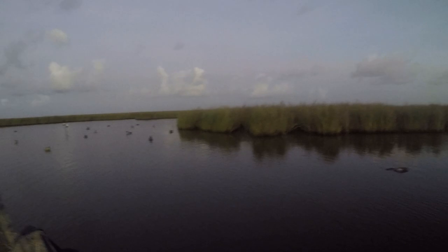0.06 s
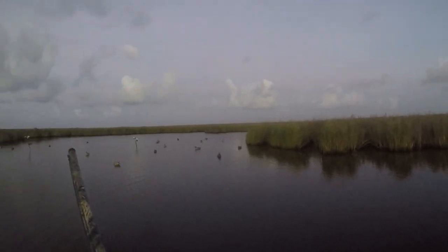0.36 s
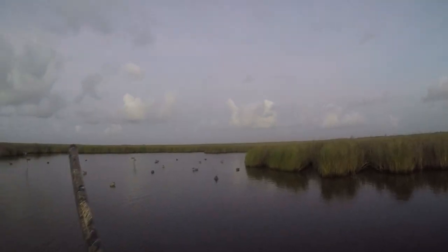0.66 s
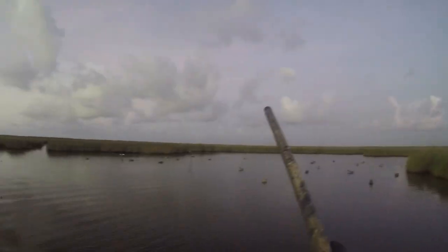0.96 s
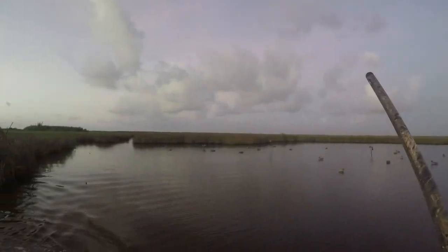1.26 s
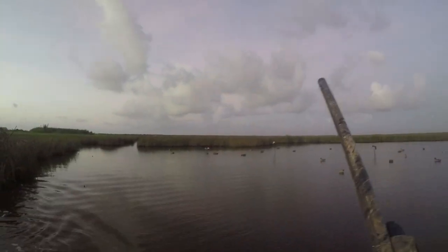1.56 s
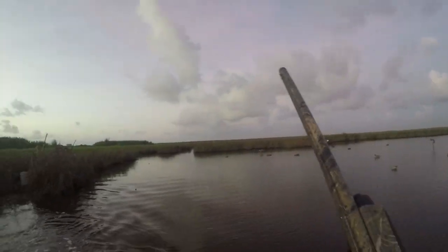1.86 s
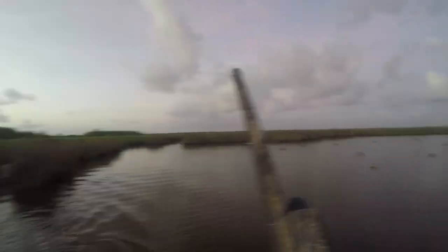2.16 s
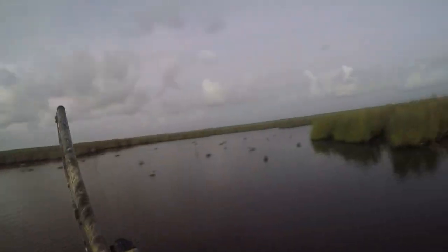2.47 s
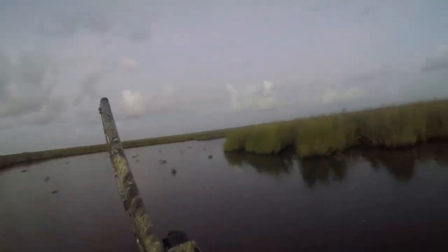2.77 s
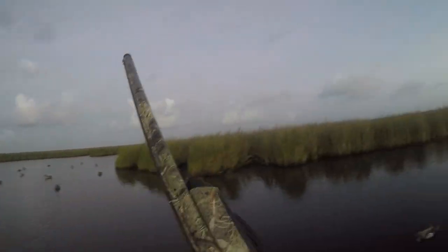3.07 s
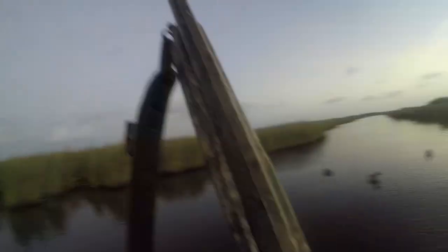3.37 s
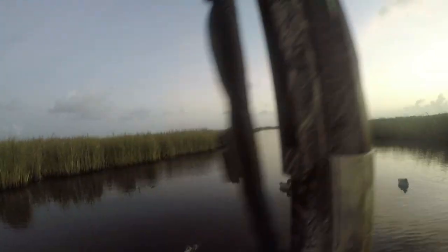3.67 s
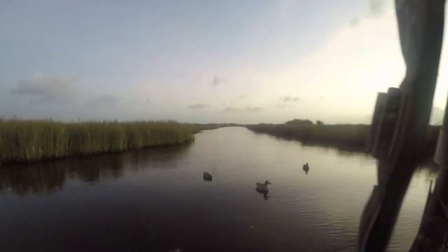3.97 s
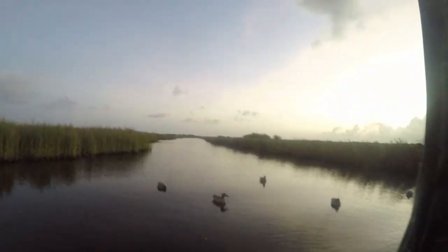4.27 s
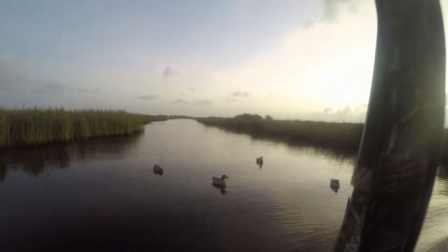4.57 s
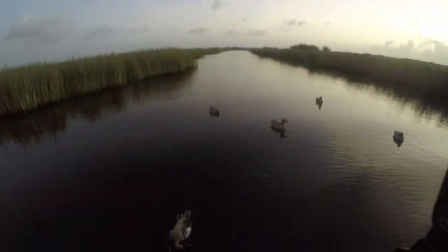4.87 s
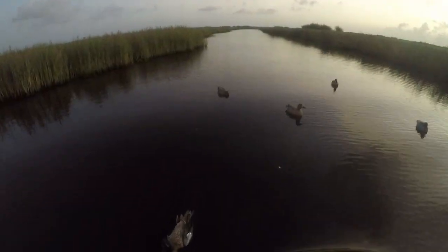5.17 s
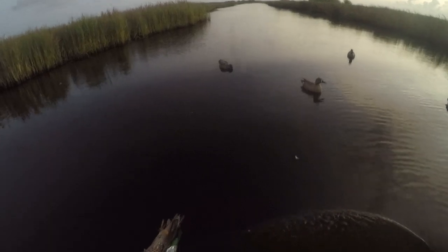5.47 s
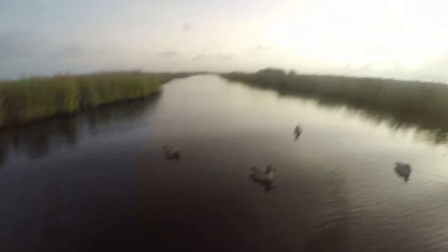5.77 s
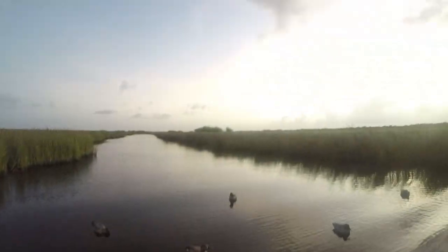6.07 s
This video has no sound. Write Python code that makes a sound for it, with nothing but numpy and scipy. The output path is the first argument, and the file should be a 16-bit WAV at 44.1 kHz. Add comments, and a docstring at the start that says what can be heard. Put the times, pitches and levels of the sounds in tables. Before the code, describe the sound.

Legs slosh and gurgle through a shallow marsh while wind buffets the microphone, gear clicks and faint insects buzz.

```python
"""Legs wade slowly through a shallow marsh, about a stride a second, heard from a head-worn camera.
Each leg pushes up a churn of bubbles and spray; between strides the water gurgles, plops and drips,
and carried gear clicks. Wind rumbles on the two microphone ports and buffets them harder near the end.
Insects sizzle in the reeds."""
import sys
import numpy as np
from scipy import signal
from scipy.fft import rfft, irfft
from scipy.io import wavfile
from scipy.ndimage import uniform_filter1d

SR = 44100
rng = np.random.default_rng(int(sys.argv[2]) if len(sys.argv) > 2 else 0)


def int16_out(signal):
    """Quantize to a 16-bit WAV file."""
    q = np.round(np.clip(np.atleast_2d(signal).T, -1, 1) * 32767)
    wavfile.write(sys.argv[1], SR, q.astype(np.int16))


N = 269430
TIME, HZ = np.arange(N) / SR, np.fft.rfftfreq(N, 1 / SR)
LEAD_S = .00028  # sound from the left reaches the left port this much earlier
SLOSH_BAND_HZ, SPRAY_BAND_HZ = (400, 1600), (2000, 6000)

# The tone of churned water. Each row: frequency in Hz, gain in dB.
WATER_TONE = [(100, -47), (200, 3.5), (330, -0.5), (600, -2), (1000, -3), (1600, -5), (2400, -7.5),
              (3500, -17), (5500, -17.5), (7200, -21), (9500, -25.5), (11200, -41), (14500, -49.5),
              (16000, -81)]


def amp(db):
    """Decibels to gain."""
    return 10 ** (np.asarray(db) / 20)


def unit(x):
    """Scales to rms 1."""
    return x / np.sqrt(np.mean(x ** 2) + 1e-20)


def curve(rows):
    """Joins (seconds, value) points into a value at every sample."""
    return np.interp(TIME, *np.transpose(rows))


def shape(points, hz=HZ):
    """An EQ curve through (Hz, dB) points, as gain."""
    f, db = np.transpose(points)
    return amp(np.interp(np.log(hz + 1), np.log(f), db))


def band(f, hz, sharpness):
    """Gain of one broad resonance."""
    return 1 / np.hypot(1, sharpness * (f / hz - hz / (f + 1)))


def colour(x, gain):
    """Filters by a gain per frequency."""
    return irfft(rfft(x) * gain, N)


def levelled(x, band_hz):
    """Scales a pair so that its middle has rms 1 within a band."""
    return x / np.std(colour(x.mean(0), (HZ > band_hz[0]) & (HZ < band_hz[1])))


def drift(hz):
    """A random wobble of rms 1, up to the given rate."""
    return unit(colour(rng.standard_normal(N), 1 / (1 + (HZ / hz) ** 4)))


def surge(start, length, rise_s, fall_s, arch_db=0):
    """Power of one push: it swells 20 dB per rise_s, holds in an arch and falls 20 dB per fall_s."""
    t = TIME - start
    outside = np.maximum(-t, 0) / rise_s + np.maximum(t - length, 0) / fall_s
    arch = (2 * np.clip(t / length, 0, 1) - 1) ** 2
    return amp(-20 * outside - arch_db * arch) ** 2


def hump(centre_s, half_width_s):
    """A bell-shaped envelope."""
    return np.exp(-((TIME - centre_s) / half_width_s) ** 2 / 2)


def spread(side_db):
    """Left and right gains for a level difference, at constant power."""
    gains = amp(np.array([side_db, -side_db]) / 2)
    return gains / np.sqrt(np.mean(gains ** 2, axis=0))


def port_colour():
    """Left and right EQ: the housing favours the left port in two broad bands."""
    # Each row: frequency in Hz, left minus right in dB.
    housing_tilt = [(250, -1), (500, -1), (950, 5.5), (2000, 10), (3000, 3.5), (4800, -1.5), (6500, -7.5),
                    (7500, 13), (8800, 16), (11000, 6.5), (15000, 12)]
    tilt = np.sqrt(shape(housing_tilt))
    return np.array([tilt, 1 / tilt])


def noise_pair(gain, likeness, phase):
    """Coloured noise on two ports, partly alike, the left leading by a phase in radians."""
    left, other = rfft(rng.standard_normal((2, N)))
    right = likeness * left * np.exp(-1j * phase) + np.sqrt(1 - likeness ** 2) * other
    return irfft(np.array([left, right]) * gain, N)


def burst(gain_at, t60, size=4096, attack_s=.0008):
    """A short coloured puff of noise that snaps on and dies away."""
    t = np.arange(size) / SR
    puff = unit(irfft(rfft(rng.standard_normal(size)) * gain_at(np.fft.rfftfreq(size, 1 / SR))))
    return puff * np.exp(-np.log(1000) * t / t60) * (1 - np.exp(-t / attack_s))


def add(mix, s, sound, lead=LEAD_S):
    """Places a sound on both ports, lead seconds later on the right."""
    for port, start in zip(mix, (s, s + lead)):
        part = port[max(round(start * SR), 0):][:len(sound)]
        part += sound[:len(part)]


def bubble(hz, t60, octaves, onset_cycles=0.328):
    """Trapped air rings as a dying, gliding tone; a climb is the bubble nearing the surface."""
    t = np.arange(int(t60 * SR) + 8) / SR
    turns = np.cumsum(hz * 2 ** (octaves * t / t60)) / SR
    onset = 1 - np.exp(-turns / onset_cycles)
    return np.sin(2 * np.pi * turns) * np.exp(-np.log(1000) * t / t60) * onset


def bubble_cloud(count, low_hz, high_hz, size_db, ring_s, scatter_s=0.000075):
    """Bubbles of many sizes around the legs; ring_s is the mean t60 at 1 kHz, small ones die sooner."""
    cloud = np.zeros((2, N))
    for when, pitch, size, sustain, glide, place in rng.random((count, 6)):
        hz = low_hz * (high_hz / low_hz) ** np.sqrt(pitch)
        t60 = ring_s * (1000 / hz) ** .7 * (.5 + sustain)
        strength = amp(size_db * min(-np.log(1 - size), 3))
        lead = LEAD_S + scatter_s * (4 * place - 2)
        add(cloud, when * N / SR, strength * bubble(hz, t60, octaves=glide / 2 - .1), lead)
    return cloud


def froth(patch_db, flicker_db):
    """Torn water hisses in short patches, with gentle surges shared by all pitches."""
    noise = noise_pair(1, likeness=0.255, phase=2 * np.pi * HZ * LEAD_S)
    spectra = signal.stft(noise, nperseg=256)[2]
    patches = uniform_filter1d(rng.standard_normal(spectra.shape[1:]), size=5, axis=0)  # across pitch
    patches = unit(uniform_filter1d(patches, size=4, axis=1))  # across time
    hiss = signal.istft(spectra * amp(patch_db * 2 * np.tanh(patches / 2)), nperseg=256)[1][:, :N]
    return unit(hiss * amp(flicker_db * np.tanh(drift(29.1))))


def droplets(per_s=400, size_db=4.6):
    """Fine spray falls back as a patter of tiny ticks."""
    hits = rng.random(N) < per_s / SR
    ticks = hits * amp(size_db * np.minimum(rng.exponential(1, N), 4)) * rng.choice([-1, 1], N)
    port_delay = np.exp(-2j * np.pi * HZ * np.array([[0], [LEAD_S]]))
    return unit(colour(ticks, port_delay))


def stirring(lapping_spray_db=-7.5, spray_swell_share=0.65):
    """Envelopes of slosh and spray: the strides on top of the lapping they leave behind."""
    # A leg pushes through the water. Each row: start and length in seconds, relative slosh and spray
    # levels in dB, seconds for the slosh to swell by 20 dB, seconds for both to settle by 20 dB.
    strides = [(0.006, 0.037, -41.5, -47.5, .1, 0.73), (0.683, 0.2117, -34, -51.5, 0.23, 0.03),
               (1.197, 0.458, -39, -42.5, .12, 0.6), (1.66, 0.14, -27.3, -39.5, 0.45, 0.26),
               (2.539, 0.1905, -30.3, -43, 0.12, 0.4068), (3.291, 0.152, -34.5, -47.5, .5, 0.09),
               (3.582, 0.1067, -32.5, -41.5, 0.1848, 0.0644), (3.706, 0.2335, -31, -37, 0.0747, 0.4147),
               (4.95, 0.17, -35.5, -48, 0.2, 0.1), (5.165, 0.31, -29.5, -36, .35, .1),
               (5.857, 0.12, -31, -41, 0.05, .2), (5.97, 0.25, -28, -39.5, 0.15, .3)]
    # Stirred water between strides. Each row: time in seconds, relative level in dB.
    lapping = [(0, -51.5), (.5, -51), (1.0, -38.5), (2.35, -41.5), (3.0, -44.5), (4.4, -47), (5.7, -44.5)]
    lapping_db = curve(lapping)
    slosh, spray = amp(lapping_db) ** 2, amp(lapping_db + lapping_spray_db) ** 2
    for start, length, slosh_db, spray_db, swell, settle in strides:
        slosh += amp(slosh_db) ** 2 * surge(start, length, swell, settle, arch_db=1.5)
        spray += amp(spray_db) ** 2 * surge(start, length, swell * spray_swell_share, settle, arch_db=2)
    return np.sqrt(slosh), np.sqrt(spray)


def wading(split_hz=1900, slosh_db=-1, spray_db=-1.5,
           bubbles_db=1, glugs_db=-4, droplets_db=-2, fizz_db=-6):
    """Each stride swells a slosh of froth, bubbles and glugs and, above it, a hiss of spray and fizz."""
    tone, low = shape(WATER_TONE) * port_colour(), 1 / (1 + (HZ / split_hz) ** 4)
    as_slosh = lambda x: levelled(colour(x, tone * low), SLOSH_BAND_HZ)
    as_spray = lambda x: levelled(colour(x, tone * (1 - low)), SPRAY_BAND_HZ)
    bubbles = bubble_cloud(count=5000, low_hz=200, high_hz=3500, size_db=3, ring_s=.028)
    glugs = bubble_cloud(count=300, low_hz=200, high_hz=1700, size_db=2, ring_s=.05)
    fizz = bubble_cloud(count=2000, low_hz=1200, high_hz=9000, size_db=4, ring_s=.02)
    churn = as_slosh(froth(patch_db=3.5, flicker_db=3.5))
    churn += amp(bubbles_db) * as_slosh(bubbles) + amp(glugs_db) * as_slosh(glugs)
    slosh = levelled(churn, SLOSH_BAND_HZ)
    hiss = froth(patch_db=4.0, flicker_db=2.0) + amp(droplets_db) * droplets()
    spray = levelled(as_spray(hiss) + amp(fizz_db) * as_spray(fizz), SPRAY_BAND_HZ)
    push, throw = stirring()
    return slosh * push * amp(slosh_db) + spray * throw * amp(spray_db)


def blowing(steady_db=-19, breeze_db=-36):
    """Level rides in dB for the rumble and the buffeting: a steady wind with swells and gusts."""
    # Swells and lulls of the rumble. Each row: centre in seconds, lift or dip in dB.
    swells = [(.1, -6), (.33, 1.5), (.53, -10), (1.1, 4.5), (1.53, -3.5), (1.93, 3.5), (2.33, -3.5),
              (2.5, 2.5), (5.0, 2.5), (5.38, -7), (5.63, 5.5)]
    # Gusts on the ports. Each row: start in seconds, length in seconds, relative level in dB.
    gusts = [(0.1, 0.48, -21.5), (4.028, 0.165, -23), (4.413, 0.21, -25.5), (4.834, 0.07, -16.5),
             (5.118, 0.062, -23.5), (5.324, 0.0918, -16), (5.615, 0.233, -21), (5.901, 0.27, -18.5)]
    swell_db = steady_db + sum(db * hump(s, half_width_s=0.062) for s, db in swells)
    power = sum(amp(db) ** 2 * surge(s, length, rise_s=0.0997, fall_s=0.399) for s, length, db in gusts)
    return swell_db, 10 * np.log10(amp(breeze_db) ** 2 + power)


def wind(rumble_db=-4.0, buffet_db=-5.5, lump_db=3.5, rumble_side_db=7,
         flutter_db=-27, flutter_growth=1.973, flutter_hz=230):
    """Large eddies rumble on both ports; small ones buffet each port and flutter higher in hard gusts."""
    # The side the wind strikes. Each row: time in seconds, lean to the left in dB.
    wind_side = [(0, -3.5), (.5, -3), (1, 2), (3.85, 4.5), (4.0, -4.5), (5.4, -9), (5.7, -5.5)]
    # The tones of large and of small eddies. Each row: frequency in Hz, gain in dB.
    rumble_tone = [(8, -3), (22, -7.5), (36, -1.5), (50, -1.5), (75, -16), (120, -34.5), (300, -44.5),
                   (900, -84.5)]
    buffet_tone = [(20, -25), (55, 0.5), (110, 0), (170, -6.5), (260, -16), (400, -30), (800, -56.5),
                   (3000, -106)]
    side_db, (swell_db, gust_db) = curve(wind_side), blowing()
    rumble = levelled(noise_pair(shape(rumble_tone), likeness=.7, phase=1.0), band_hz=(20, 70))
    rumble *= spread(side_db + rumble_side_db) * amp(swell_db + rumble_db)
    eddies = levelled(noise_pair(shape(buffet_tone), likeness=.2, phase=0), band_hz=(80, 220))
    low_cut = HZ ** 2 / (HZ ** 2 + flutter_hz ** 2)
    flutter = unit(noise_pair(shape(buffet_tone) * low_cut, likeness=0, phase=0))
    flutter *= amp(flutter_db + flutter_growth * (gust_db + 19.5))
    buffet = eddies * amp(gust_db + buffet_db) + flutter
    lumps = amp(lump_db * np.array([drift(13.4), drift(23.2)]))
    return rumble + buffet * spread(side_db) * lumps


def insects(level_db=1, shimmer_db=1.5, housing_share=.35):
    """A distant chorus merges into one steady sizzle, partly coloured by the housing."""
    # The sizzle peaks near 7 kHz. Each row: frequency in Hz, gain in dB.
    chorus_tone = [(3000, -28), (6000, -17.5), (6650, -10.5), (6980, -.5), (7250, 1), (7550, -5),
                   (7950, -13.5), (8800, -15), (11000, -28), (15500, -38)]
    # Its slow rise and fall. Each row: time in seconds, relative level in dB.
    chorus_ride = [(0.0, -48.5), (2.3, -51), (3.25, -46), (4.35, -48.5), (6.11, -51)]
    chorus = noise_pair(shape(chorus_tone) * port_colour() ** housing_share, likeness=0.328, phase=2.61)
    chorus *= amp(shimmer_db * drift(71))
    return levelled(chorus, band_hz=(6800, 7600)) * amp(curve(chorus_ride) + level_db)


def plops(level_db=4, ring_s=.031, glide_stretch=.35, slop_db=-4, slop_ratio=0.752,
          db_per_octave=-4, twin_db=-7, twin_ratio=1.45, twin_s=.007):
    """A cavity claps shut with a hollow slop; the trapped air rings, and a smaller bubble splits off."""
    # The larger air pockets. Each row: start in seconds, relative level in dB, starting pitch in Hz,
    # glide in octaves over the ring.
    pockets = [(.073, -26, 390, -1.4), (.678, -32, 667, 0), (.888, -28, 720, -.5), (.982, -25, 290, 0.5),
               (1.004, -20.5, 345, 1.5), (1.091, -25, 298, -0.8), (1.197, -28, 725, -.5),
               (1.227, -26.5, 1450, .5), (1.287, -23.5, 1012, 0.5), (1.356, -24, 1516, -0.3),
               (1.533, -25, 340, .5), (1.547, -26, 1600, 0), (1.638, -24, 850, .7), (1.721, -20.5, 490, .4),
               (1.884, -21.5, 400, -.6), (2.051, -30, 1200, .3), (2.072, -30.5, 560, 1.1),
               (2.179, -31, 1680, .6), (2.229, -29.5, 1300, -.6), (2.286, -30.5, 600, -.4),
               (2.355, -26, 830, -1.4), (2.436, -22, 320, .6), (2.464, -29, 1030, .3),
               (2.548, -21, 800, -.5), (2.575, -23, 1200, .7), (2.604, -20, 780, 0.1),
               (2.801, -18, 300, .7), (2.843, -25, 590, .3), (3.008, -25, 240, -.5), (3.096, -21, 479, 0.8),
               (3.202, -22.5, 326, -1), (3.403, -17.5, 500, .6), (3.428, -26.5, 1126, -0.5),
               (3.587, -23.5, 1950, .5), (3.616, -23, 611, 0.3), (3.66, -24, 1480, .3),
               (3.85, -22, 297, 0.1), (3.973, -23, 1458, -0.3), (4.434, -26.5, 720, .3),
               (4.509, -28.5, 800, 2.4), (4.604, -23, 1150, 0.1), (4.647, -27, 850, 0.1),
               (4.675, -24.5, 1054, -.3), (4.707, -30, 1950, -.7), (4.722, -22.5, 1425, -1),
               (4.79, -32, 1080, .8), (4.945, -25, 770, .4), (4.992, -26, 814, -0.7),
               (5.168, -22, 888, 0.4), (5.267, -21.5, 890, .4), (5.348, -18.5, 519, -0.3),
               (5.38, -23, 1180, .6), (5.459, -23, 495, .7), (5.641, -33, 875, .6), (5.868, -24, 1007, -1),
               (5.972, -18.5, 360, .3)]
    out = np.zeros((2, N))
    for s, db, hz, octaves in pockets:
        t60 = ring_s * np.sqrt(1000 / hz) * (1 + glide_stretch * octaves ** 2)
        slop = burst(lambda f: band(f, hz * slop_ratio, sharpness=0.68) ** 2, t60)
        twin = bubble(hz * twin_ratio, t60 / 2, octaves=0)
        small_db = db_per_octave * max(np.log2(hz / 500), 0)  # small pockets: less slop and twin
        add(out, s, amp(db + level_db) * bubble(hz, t60, octaves))
        add(out, s, amp(db + level_db + slop_db + small_db) * slop)
        add(out, s + twin_s, amp(db + level_db + twin_db + small_db) * twin)
    return out


def slaps(level_db=3, sharpness=2.86, top_hz=10500):
    """Flung water lands with a broad, short splat."""
    # Each row: start in seconds, relative level in dB, t60 in seconds, centre in Hz.
    landings = [(.073, -32.5, 0.0127, 7960), (0.938, -29, 0.0093, 8800), (1.004, -25, 0.058, 2006),
                (1.009, -20.5, 0.0406, 4950), (1.078, -27, 0.0089, 7960), (1.468, -28, 0.0102, 7000),
                (2.108, -27, 0.0119, 6700), (2.2, -22, 0.0197, 4400), (2.869, -27, 0.028, 6420),
                (3.183, -22, 0.026, 2080), (3.732, -20.5, 0.0146, 4500), (3.75, -24, .018, 4600),
                (4.435, -28, .017, 1600), (5.093, -17, 0.016, 3650), (5.142, -25, .015, 6000),
                (5.168, -18, 0.026, 2380), (5.296, -22, 0.0202, 2570), (5.404, -22, 0.022, 2090),
                (5.445, -19, 0.0122, 5680), (5.864, -22, 0.035, 1600)]
    out = np.zeros((2, N))
    for s, db, t60, hz in landings:
        splat = burst(lambda f: band(f, hz, sharpness) / (1 + (f / top_hz) ** 10), t60)
        add(out, s, amp(db + level_db) * splat)
    return out


def mist(centre_hz=8370, sharpness=4.0, top_hz=11000):
    """At the crest of a brisk stride the finest spray sizzles back onto the water."""
    # Each row: time of the crest in seconds, level in dB.
    crests = [(.87, -47.5), (1.77, -39), (2.7, -42.5), (3.82, -49)]
    tone = port_colour() * band(HZ, centre_hz, sharpness) / (1 + (HZ / top_hz) ** 8)
    sizzle = unit(colour(droplets(per_s=4200, size_db=4.5), tone))
    return sizzle * sum(amp(db) * hump(s, half_width_s=0.0614) for s, db in crests)


def dribble(fade_s=0.12):
    """Water runs off the lifted leg in a dense gurgle."""
    # Each row: start in seconds, length in seconds, level in dB.
    runoffs = [(1.16, .24, -41.5), (2.02, .36, -45), (3.146, .3, -40), (4.76, .32, -41.5)]
    plinks = bubble_cloud(count=2200, low_hz=350, high_hz=2100, size_db=2.5, ring_s=.028)
    flow = np.sqrt(sum(amp(db) ** 2 * surge(s, length, fade_s, fade_s) for s, length, db in runoffs))
    return levelled(colour(plinks, shape(WATER_TONE) * port_colour()), SLOSH_BAND_HZ) * flow


def gear():
    """Gun and sling fittings knock: a hard tick sets a small part ringing."""
    # Each row: start in seconds, relative level in dB, tick t60 in seconds, ring against tick in dB.
    knocks = [(1.3066, -7.5, 0.0099, -39), (4.338, -18, 0.0173, -7)]
    # The fitting's modes. Each row: frequency in Hz, relative level in dB, t60 in seconds.
    modes = [(1068, -3, 0.044), (1920, -15, 0.048), (3196, -20, 0.16), (6480, -7, 0.05), (7650, -12, 0.035)]
    # The tick's bright tone. Each row: frequency in Hz, gain in dB.
    tick_tone = [(500, -6.5), (1900, -2), (2800, 4.5), (5500, -2), (8500, 2.5), (10500, -0.5), (13000, -17)]
    out, t = np.zeros((2, N)), np.arange(SR // 4) / SR
    ring = sum(amp(db) * np.exp(-np.log(1000) * t / t60) * np.sin(2 * np.pi * hz * t)
               for hz, db, t60 in modes)
    for s, db, t60, ring_db in knocks:
        add(out, s, amp(db) * burst(lambda f: shape(tick_tone, f), t60), lead=0)
        add(out, s, amp(db + ring_db) * ring, lead=0)
    return out


def thumps(left_db=-12):
    """A passing eddy gives one push and pull of pressure, mostly on the right port."""
    # Each row: centre in seconds, peak on the right in dB, main frequency in Hz.
    eddies = [(3.995, -5.5, 89), (4.061, -6.5, 141.2), (4.159, -5.5, 100.8), (4.515, -9, 91.5),
              (4.824, -11.5, 107)]
    out, t = np.zeros((2, N)), np.arange(-1024, 1024) / SR
    for s, db, hz in eddies:
        pulse = np.cos(2 * np.pi * hz * t) * np.exp(-(2 * hz * t) ** 2 / 2)
        add(out, s + t[0], amp(db) * pulse)
    return out * amp([[left_db], [0]])


def scene():
    """Open marsh: nothing throws the sound back."""
    water = wading() + mist() + dribble()
    accents = colour(plops() + slaps() + gear(), port_colour())
    return water + accents + wind() + thumps() + insects()


def record(dry, ceiling=.95, top_hz=15500):
    """Peaks are rounded off near full scale; then the camera's band limit trims the top."""
    rounded = dry / (1 + (dry / ceiling) ** 8) ** (1 / 8)
    high_cut = signal.firwin(511, top_hz, window=("kaiser", 9), fs=SR)
    return signal.oaconvolve(rounded, high_cut[None], "same")


dry = scene()
out = record(dry)
int16_out(out)
```